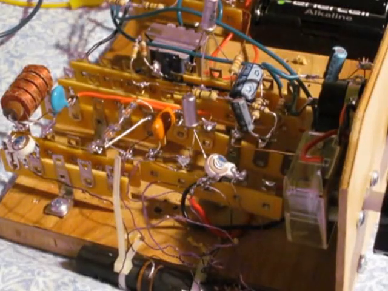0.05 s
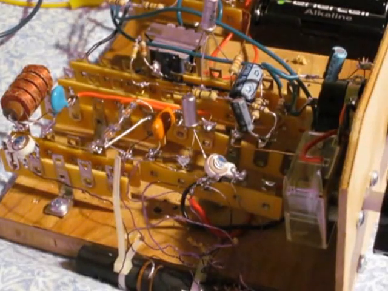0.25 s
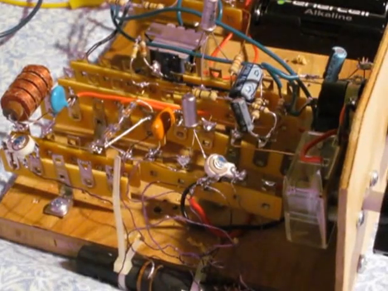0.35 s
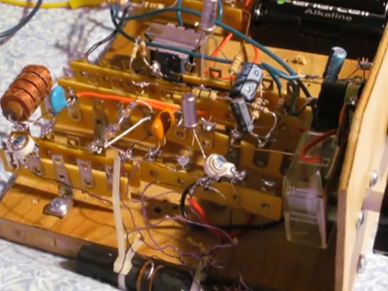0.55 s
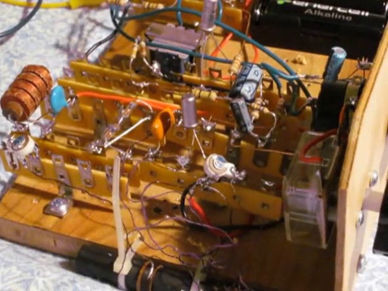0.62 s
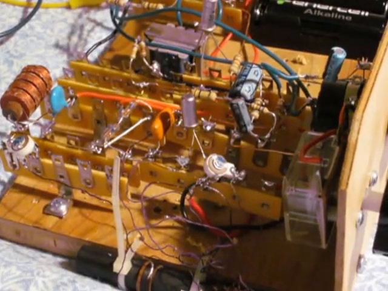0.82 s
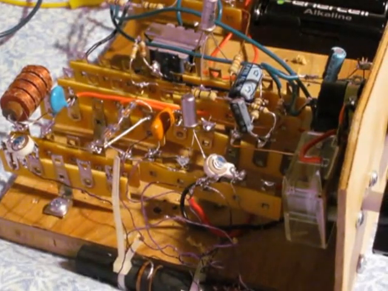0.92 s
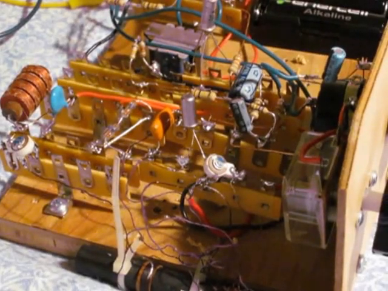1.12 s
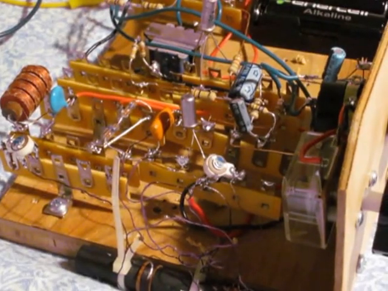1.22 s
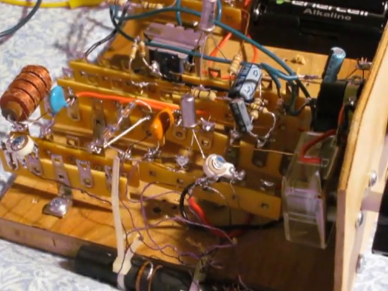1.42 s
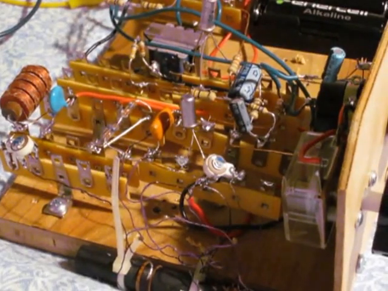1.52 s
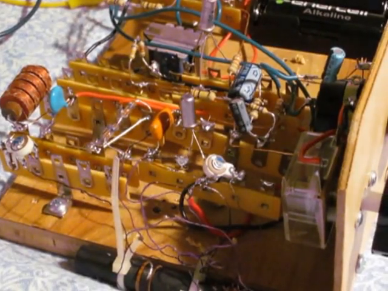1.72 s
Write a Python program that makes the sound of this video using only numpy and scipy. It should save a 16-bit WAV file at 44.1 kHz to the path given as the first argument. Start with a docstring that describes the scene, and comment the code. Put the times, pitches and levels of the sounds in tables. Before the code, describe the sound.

Small electronic parts click and scrape briefly, then tick faintly over a steady whirring hiss.

```python
"""A camcorder's tape drive hisses, whirs and whines, its head drum brushing the tape once a turn.
Close by, a small home-built radio circuit on a wooden board is handled: its parts click in quick
clusters of contacts and rub with a short crackle of tiny slips. The loudest click sets a thin metal
part ringing faintly and makes the limiter duck. Then the parts settle with a few faint ticks."""
import sys
import numpy as np
from scipy import signal
from scipy.fft import rfft, irfft, next_fast_len
from scipy.io import wavfile
from scipy.ndimage import map_coordinates

SR = 44100
rng = np.random.default_rng(int(sys.argv[2]) if len(sys.argv) > 2 else 0)


def int16_out(signal):
    """Quantize to a 16-bit WAV file."""
    q = np.round(np.clip(np.atleast_2d(signal).T, -1, 1) * 32767)
    wavfile.write(sys.argv[1], SR, q.astype(np.int16))


N = 77175

# The wooden board's resonances. Each row: centre in Hz, width in Hz, lift in dB.
BOARD_RESONANCES = [(608, 23, 6.5), (814, 59, 6.5), (1236, 110, 1.5), (1750, 92, 1), (2140, 290, 1.5),
                    (3310, 107, 8.5)]


def amp(db):
    """Decibels to gain."""
    return 10 ** (np.asarray(db) / 20)


def add(out, start_s, x):
    """Mix x into out from start_s on."""
    i = round(start_s * SR)
    out[i:i + len(x)] += x[:len(out) - i]


def fade(t, t60):
    """Exponential decay, 60 dB down after t60 seconds."""
    return np.exp(-np.log(1000) * t / t60)


def wobble(knots_per_s):
    """A smooth curve through random knots."""
    return map_coordinates(rng.standard_normal(N // 100), [np.arange(N) * knots_per_s / SR], mode="wrap")


def colour(x, spectrum, resonances=()):
    """A causal EQ through (Hz, dB) points, lifted at the resonances."""
    size = 2 * next_fast_len(len(x))
    hz = np.fft.rfftfreq(size, 1 / SR)
    point_hz, point_db = np.transpose(spectrum)
    db = np.interp(np.log(hz + 1), np.log(point_hz), point_db)
    for centre, width, lift in resonances:
        db = db + lift / (1 + (2 * (hz - centre) / width) ** 2)
    # Minimum phase, so nothing rings ahead of a hit.
    cepstrum = irfft(np.log(amp(db)))
    cepstrum[1:size // 2] *= 2
    cepstrum[size // 2 + 1:] = 0
    return irfft(rfft(x, size) * np.exp(rfft(cepstrum)), size)[:len(x)]


def noise(spectrum, resonances=()):
    """Steady coloured noise at rms 1."""
    x = colour(rng.standard_normal(N), spectrum, resonances)
    return x / np.sqrt(np.mean(x ** 2) + 1e-20)


def burst(t60, spectrum, resonances=(), top_hz=SR):
    """A coloured noise hit that rises fast and dies, with the energy of 1 ms at full level."""
    t = np.arange(4096) / SR
    attack_s = 0.08 * t60
    envelope = (1 - np.exp(-t / attack_s)) * fade(t, t60)
    x = rng.standard_normal(len(t)) * envelope
    for _ in range(3):  # even out the spectrum while keeping the envelope
        even = irfft(np.exp(1j * np.angle(rfft(x))))
        x = envelope * np.cos(np.angle(signal.hilbert(even)))
    rolled_off = [(hz, db - 10 * np.log10(1 + (hz / top_hz) ** 4)) for hz, db in spectrum]
    x = colour(x, rolled_off, resonances)
    return x / np.linalg.norm(x) * np.sqrt(SR / 1000)


def tape_drive():
    """The running drive: wavering whine lines, an uneven whir and hiss coloured by the shell."""
    # The whine's lines, then the EQ of whir and hiss. Each row: frequency in Hz, level in dB.
    whine_lines = [(1262, -64.5), (1292, -64), (1547, -62), (1577, -63), (1605, -57), (1863, -58.5),
                   (1894, -63), (2151, -61.5), (2180, -71), (2437, -82), (2466, -62.5), (6115, -72),
                   (6148, -72), (7564, -110), (7881, -89.5), (10190, -70.5)]
    whir_eq = [(400, -35.5), (700, -5.5), (810, 11), (950, -22.5), (1120, 8.5), (1400, -21), (3000, -34.5)]
    hiss_eq = [(20, 0.5), (40, 7.5), (90, 4), (300, 2.5), (700, 1.5), (1400, -2), (2300, 2), (2850, 1),
               (3200, -5), (4200, -5), (6500, -9), (7200, -3.5), (8300, -12.5), (10800, -13.5),
               (13000, -15), (15700, -23)]
    # The camcorder shell's resonances. Each row: centre in Hz, width in Hz, lift in dB.
    shell_resonances = [(833.6, 82, 9.2), (1110, 140, 14.6), (1577, 130, 9.5), (2045, 154, 7.7),
                        (2570, 68, 9.5), (3426, 110, 8.9), (9050, 340, 8.7), (12160, 400, 4)]
    trim_db, flutter_db, wander_hz = -0.5, 0.5, 1.5
    whine = np.zeros(N)
    for hz, db in whine_lines:
        rms = amp(db + trim_db + flutter_db * wobble(9.9))
        phase = 2 * np.pi * np.cumsum(hz + wander_hz * wobble(20)) / SR
        whine += rms * np.sqrt(2) * np.sin(phase)
    whir = amp(-57 + 1.5 * wobble(44.47)) * noise(whir_eq)
    hiss = amp(-47.5) * noise(hiss_eq, shell_resonances)
    return hiss + whir + whine


def head_drum():
    """The spinning drum brushes the tape once a turn: a faint pulsing sizzle."""
    # The brush's EQ. Each row: frequency in Hz, level in dB.
    brush_eq = [(9700, -29), (10400, 9), (10750, -2), (11300, -1), (12400, -11), (13500, -35)]
    turns_per_s, first_brush_s, sharpness = 29.97, 0.0037, 5.2
    t = np.arange(N) / SR
    pulses = abs(np.cos(np.pi * turns_per_s * (t - first_brush_s))) ** sharpness
    return amp(-60 + wobble(23.4)) * pulses * noise(brush_eq)


def clicks():
    """Each contact knocks the board, snaps, thuds and briefly rings the part that was touched."""
    # Each row: start in seconds, T60 of knock and snap in seconds, knock in dB, snap in dB,
    # snap centre in Hz, the part's pitch in Hz, its ring in dB, thud in dB.
    contacts = [ (0.1028, 0.0048, -37, -33, 9600, 2680, -29.5, -41),
                (.1495, 0.014, -24.5, -35, 7700, 990, -21.5, -50),
                (.1505, 0.0041, -38, -29, 7340, 4530, -26, -68),
                (0.1511, 0.006, -48, -39, 7500, 2810, -22.5, -57.5),
                (.2201, .002, -15.5, -17, 3730, 1134, -15.5, -41),
                (0.222, 0.0024, -24, -41, 3300, 1460, -17, -48),
                (0.2364, 0.0065, -20.5, -39, 3000, 880, -18, -30),
                (0.2485, 0.016, -39, -32, 3000, 2340, -26, -43),
                (.2690, 0.0051, -16.5, -7, 7840, 1143, -3.5, -53),
                (0.2713, 0.0044, -7, -3, 2570, 2460, -32, -39),
                (.2720, 0.0076, -6.5, -14.5, 11300, 1430, -13, -36),
                (0.3687, 0.014, -11, -25, 8300, 1890, -6, -26),
                (0.3736, 0.011, -14.5, -23.5, 8110, 1316, -16, -30),
                (0.3941, 0.00186, -12.5, -23, 2080, 1486, -11, -34),
                (0.3986, 0.0084, -23.5, -56, 4000, 1225, -14, -42),
                (0.4098, 0.011, -22, -39, 8100, 1650, -21, -38),
                (.4385, 0.0036, -22.5, -44.5, 7900, 1240, -16, -36),
                (.5353, .005, -23.5, -46, 3700, 1390, -20, -58),
                (0.5395, .010, -18, -41, 2340, 1244, -6.5, -55),
                (.5870, 0.011, -26, -26, 7500, 3950, -23, -61),
                (0.5901, 0.0041, -15.5, -17.5, 3830, 2080, -19, -33),
                (0.5929, 0.0055, -14, -8.5, 11940, 2790, -16, -58),
                (.5960, 0.0053, -17, -9, 9700, 1545, -16.5, -54),
                (.5995, 0.0083, -17.5, -26, 10900, 2100, -26.5, -46)]
    # The EQ of woody knock, bright snap and low thud. Each row: frequency in Hz, level in dB.
    knock_eq = [(100, -53), (350, -17), (600, -11.5), (850, -2.5), (1300, 3), (2000, -2.5), (2700, 0),
                (3100, -15.5), (3700, -6), (4600, -29.5), (8000, -24), (16000, -68)]
    snap_eq = [(800, -33.5), (2500, 16.5), (4000, 3.5), (5900, 0.5), (7500, 2.5), (9000, -3), (10500, 0.5),
               (13000, -3), (15500, 6)]
    thud_eq = [(40, -13), (100, -3.5), (180, 4), (300, -1), (600, 4.5), (1500, -43), (5000, -80)]
    snap_lift_db, ring_attack_s = 13.5, 0.00064
    out, t = np.zeros(N), np.arange(SR // 2) / SR
    ring_envelope = fade(t, t60=0.016) * (1 - np.exp(-t / ring_attack_s))
    for start_s, t60, knock_db, snap_db, snap_hz, part_hz, ring_db, thud_db in contacts:
        snap_peak = [(snap_hz, 0.53 * snap_hz, snap_lift_db)]
        add(out, start_s, amp(knock_db) * burst(t60, knock_eq, BOARD_RESONANCES))
        add(out, start_s, amp(snap_db) * burst(t60, snap_eq, snap_peak, top_hz=1.65 * snap_hz))
        add(out, start_s, amp(thud_db) * burst(t60=0.022, spectrum=thud_eq))
        add(out, start_s, amp(ring_db) * np.sin(2 * np.pi * part_hz * t) * ring_envelope)
    return out


def scrapes():
    """Rubbing is a dense run of tiny slips into the board's resonances."""
    # Rubbing strokes. Each row: start in seconds, length in seconds, level in dB.
    strokes = [(0.133, 0.053, -47.5), (0.234, 0.051, -38.5), (.359, 0.0071, -33.5), (0.366, 0.0039, -21),
               (0.381, 0.0035, -22), (0.394, 0.0048, -22.5), (0.407, 0.014, -28), (0.423, 0.011, -26),
               (.438, 0.013, -29), (0.523, 0.022, -29.5), (0.576, 0.029, -33)]
    # The rubbing's EQ. Each row: frequency in Hz, level in dB.
    scrape_eq = [(60, -45), (180, -28), (400, -16), (650, -7.5), (1000, -6), (1300, 1), (1800, -3.5),
                 (2400, -5.5), (3000, -19.5), (4500, -17), (8000, -23.5), (12000, -30), (16000, -46)]
    attack_s, release_s, slips_per_s, spread_db = 0.0009, 0.0035, 2700, 3
    out, t = np.zeros(N), np.arange(SR // 10) / SR
    for start_s, length_s, db in strokes:
        slipping = rng.random(len(t)) < slips_per_s / SR
        slips = slipping * amp(spread_db * rng.standard_normal(len(t))) * rng.choice([-1, 1], len(t))
        envelope = (1 - np.exp(-t / attack_s)) * np.exp(-np.maximum(t - length_s, 0) / release_s)
        crackle = colour(slips * envelope, scrape_eq, BOARD_RESONANCES)
        add(out, start_s, amp(db) * crackle / np.linalg.norm(crackle) * np.sqrt(length_s * SR))
    return out


def metal_ring():
    """A thin metal part rings on in two modes after the loudest click."""
    # Each row: frequency in Hz, level in dB, T60 in seconds.
    modes = [(3430, -45, 0.15), (3962, -42, 0.27)]
    start_s = 0.270
    out, t = np.zeros(N), np.arange(SR // 2) / SR
    for hz, db, t60 in modes:
        add(out, start_s, amp(db) * np.sin(2 * np.pi * hz * t) * fade(t, t60))
    return out


def settling_ticks():
    """The parts settle, each faint tick sounding through the board."""
    # Each row: start in seconds, relative level in dB.
    ticks = [(0.641, -34), (0.707, -29), (0.874, -27), (0.975, -28.5), (1.111, -25.5), (1.207, -26.5),
             (1.444, -31), (1.657, -25), (1.677, -25)]
    # A tick's EQ. Each row: frequency in Hz, level in dB.
    tick_eq = [(300, -37.5), (800, 3.5), (1400, 3), (2600, -13), (4000, -12), (12000, -26)]
    trim_db, t60 = -10, 0.014
    out = np.zeros(N)
    for start_s, db in ticks:
        add(out, start_s, amp(db + trim_db) * burst(t60, tick_eq, BOARD_RESONANCES))
    return out


def room(x):
    """The short, dull answer of a small furnished room."""
    t = np.arange(SR // 2) / SR
    tail = colour(rng.standard_normal(len(t)) * fade(t, t60=0.25), [(2500, -3), (12000, -14.5)])
    return signal.fftconvolve(x, tail / np.linalg.norm(tail))[:N]


def scene():
    """Close handling with a touch of room, over the bed of the tape drive, in mono."""
    handling = clicks() + settling_ticks() + metal_ring() + scrapes()
    return (handling + amp(-28) * room(handling) + tape_drive() + head_drum())[None]


def record(dry):
    """The camcorder's limiter eases in and recovers slowly; a steep low-pass trims the top."""
    threshold_db, attack_s, recover_db_per_s, top_hz = -4.5, 0.0013, 73, 15900
    over_db = np.maximum(20 * np.log10(abs(dry[0]) + 1e-9) - threshold_db, 0)
    recovery_db = recover_db_per_s * np.arange(N) / SR
    duck_db = np.maximum.accumulate(over_db + recovery_db) - recovery_db
    lag = np.exp(-1 / (attack_s * SR))
    for _ in range(2):  # two smoothing stages let the click's front edge through
        duck_db = signal.lfilter([1 - lag], [1, -lag], duck_db)
    low_pass = signal.butter(48, top_hz, fs=SR, output="sos")
    return signal.sosfilt(low_pass, dry * amp(-duck_db))


dry = scene()
out = record(dry)
int16_out(out)
```